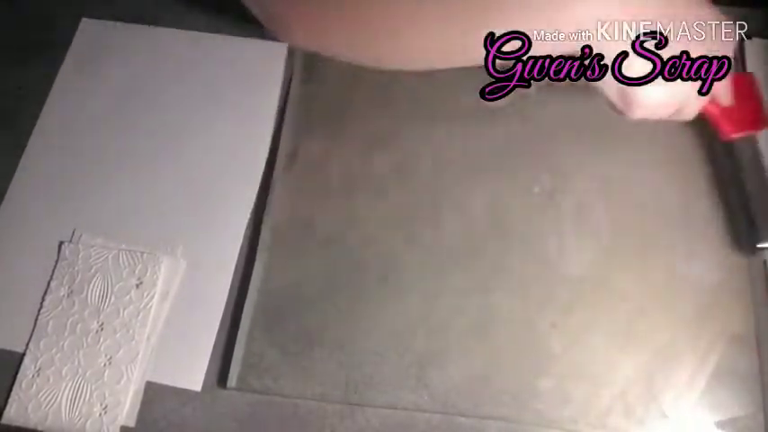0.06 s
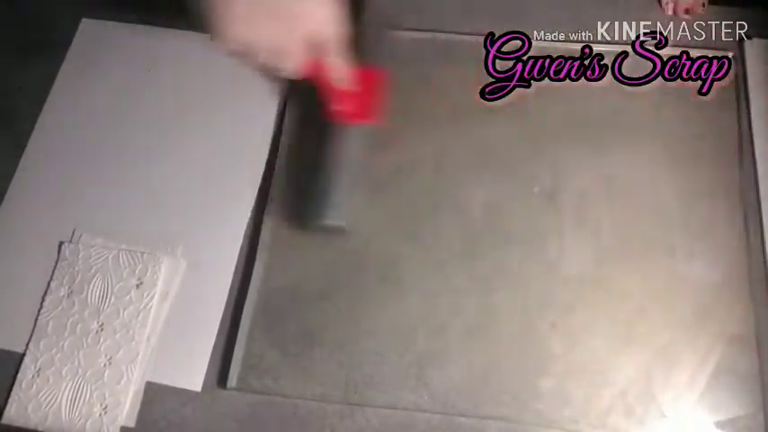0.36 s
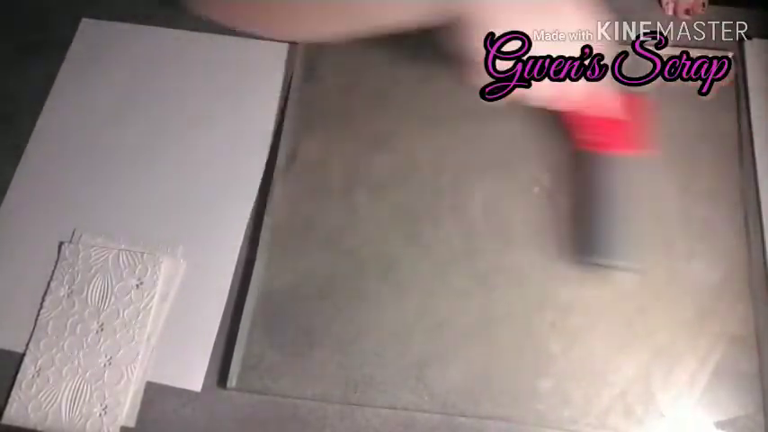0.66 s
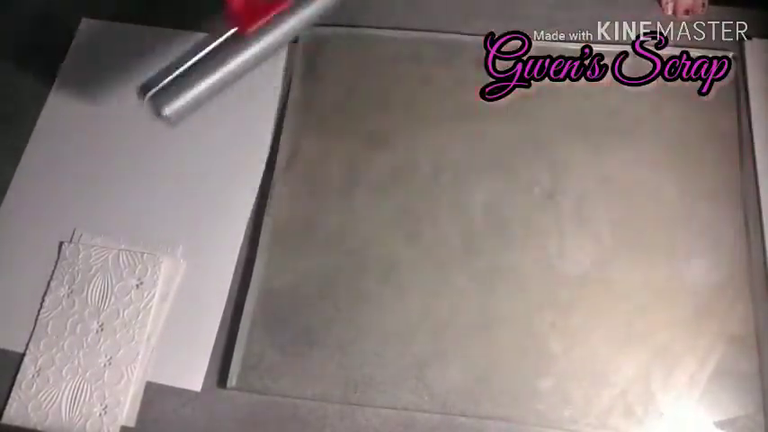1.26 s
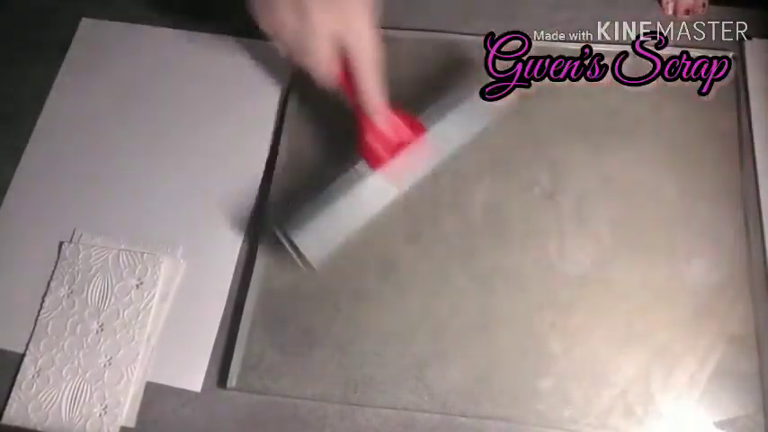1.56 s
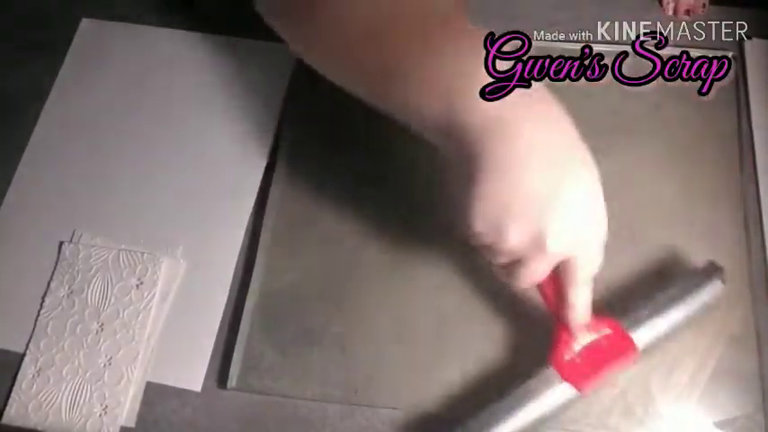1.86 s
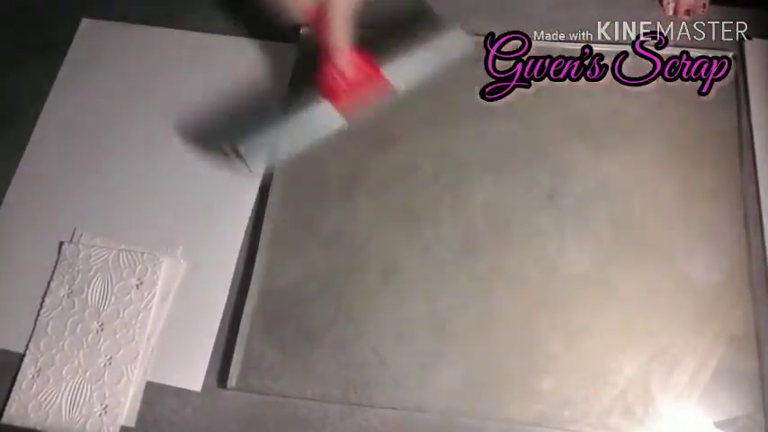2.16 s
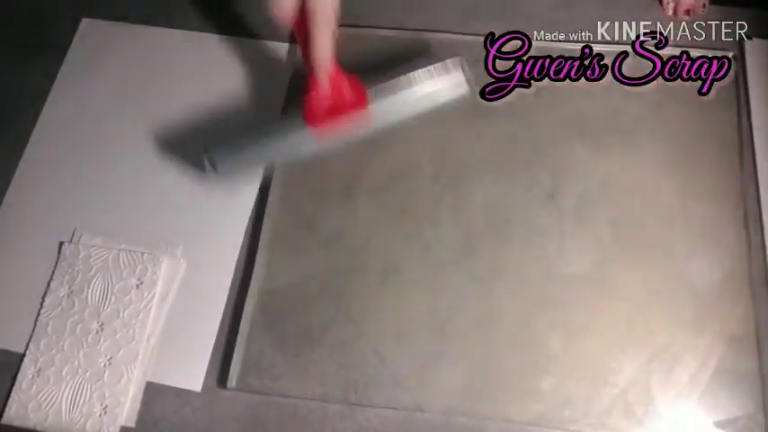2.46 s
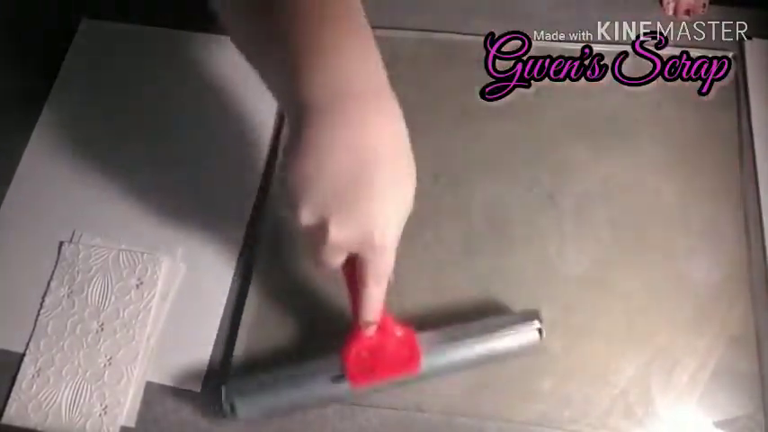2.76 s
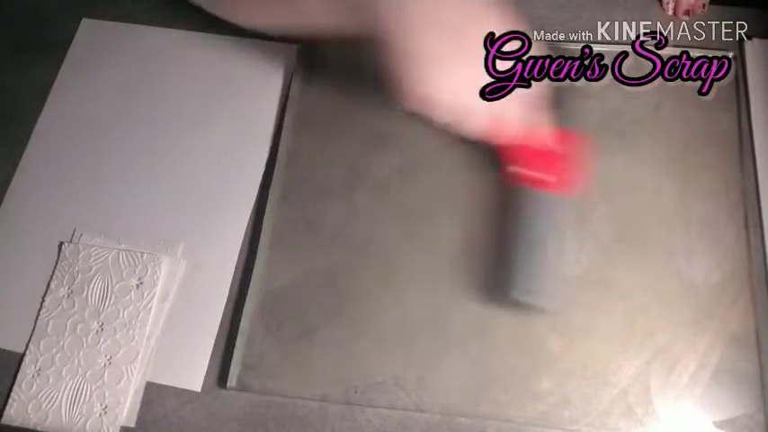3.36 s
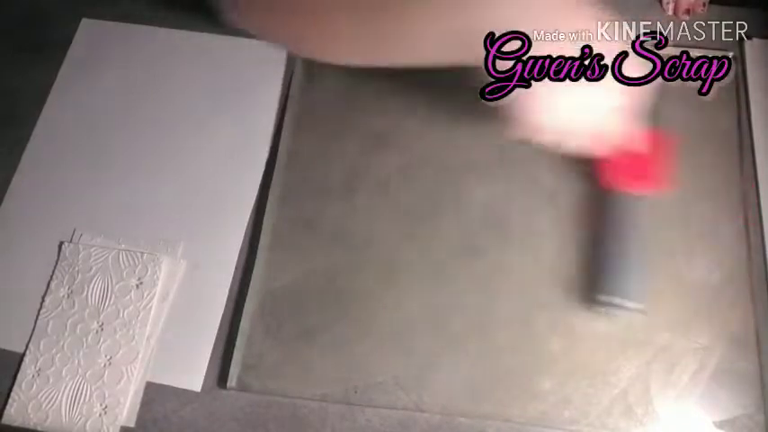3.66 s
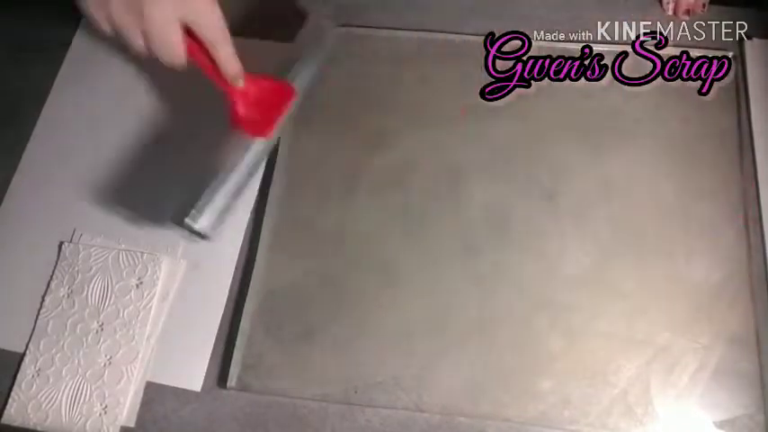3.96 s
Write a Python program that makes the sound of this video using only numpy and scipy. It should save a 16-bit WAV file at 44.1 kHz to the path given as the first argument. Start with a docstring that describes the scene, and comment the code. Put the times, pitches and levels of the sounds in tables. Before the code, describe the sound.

Close by in a small, quiet room, wet paint hisses and peels under a rubber hand roller in repeated strokes, each with a low table rumble. Twice the loose roller comes off the gel plate, spins with light clinks and is set down with a loud clack. The handle gives a few dull knocks between strokes. After more sticky rolling, it lifts and rattles again over faint room air and hum.

```python
"""A rubber roller runs to and fro through wet paint on a gel plate, over faint room air and hum.
From the first stroke the paint film peels off with a sticky hiss and the table rumbles beneath it.
Lifted at 1.1 s, the loose roller spins and clacks in its frame, then lands with a thump at 1.45 s.
It rolls on, lifts at 2.2 s and lands harder at 2.4 s. More strokes follow, with dull knocks of the
handle, until a last lift at 3.9 s sets it clacking again."""
import sys
import numpy as np
from scipy import signal
from scipy.fft import rfft, irfft
from scipy.io import wavfile

SR = 44100
rng = np.random.default_rng(int(sys.argv[2]) if len(sys.argv) > 2 else 0)


def transcribe(signal):
    """Save signal, clipped to [-1, 1], as a 16-bit WAV file at the path in sys.argv[1]."""
    frames = np.atleast_2d(signal).T
    limited = np.clip(frames, -1, 1)
    pcm = np.round(limited * 32767).astype(np.int16)
    wavfile.write(sys.argv[1], SR, pcm)


N = 185670
TIME, HZ = np.arange(N) / SR, np.fft.rfftfreq(N, 1 / SR)
AGE = TIME[:SR // 2]  # seconds since a blow
ROLLER_HZ, MEDIUM_BLOW_DB = 1938, -42

# pushes and pulls of the roller: fastest_s, speed_up_s, slow_down_s, hiss_db, weight_db, chafe_db
STROKES = [(-.1, .2, 0.18, -49, -47, -59), (0.299, 0.19, 0.15, -51, -48.5, -65.5),
           (.646, .143, 0.19, -49, -48.5, -66), (.982, 0.14, 0.37, -48.5, -45, -55.5),
           (1.702, 0.45, 0.24, -52.5, -61.5, -68.5), (2.046, .11, 0.53, -49, -54, -63.5),
           (2.649, .324, 0.11, -52, -62, -67.5), (2.911, 0.062, 0.2, -48, -52.5, -71),
           (3.388, 0.23, 0.21, -50, -51, -68.5), (3.819, 0.23, 0.21, -48.5, -49, -68)]
# the lifted roller spins freely: start_s, airborne_s, chafe_db
LIFTS = [(1.104, .347, -67), (2.192, .211, -65.5), (3.914, .35, -74)]
# the loose roller strikes its frame: start_s, crack_db, frame_db, roller_db, handle_db
CLACKS = [(1.092, -37, -63, -29.5, -41.5), (1.126, -44, -74, -66, -54), (1.2657, -56, -61, -44.5, -56.5),
          (1.354, -40.5, -44, -38, -45.5), (1.3635, -35.5, -32, -30, -52), (1.369, -43, -53, -43, -56),
          (1.397, -49, -58, -42, -65), (1.468, -52, -46, -44, -59), (2.183, -49, -56, -48, -43.5),
          (2.376, -52, -46, -52, -42.5), (2.387, -60, -37.5, -49, -56), (3.896, -52.5, -62, -46, -50.5),
          (4.025, -45, -46.5, -44.5, -45.5), (4.142, -58, -66, -53, -55.5),
          (4.1475, -53.5, -54.5, -42, -52.5), (4.178, -36, -33.5, -35.5, -46)]
# the roller is set down hard: start_s, crack_db, frame_db, thump_db
LANDINGS = [(1.4521, -23, -21.5, -28.5), (2.403, -19, -18.5, -24)]
# likeness of the sound at the two microphone ports: frequency_hz, correlation
COHERENCE = [(60, .993), (130, .96), (290, .8), (640, .46), (1400, -.1), (3100, 0), (15000, 0)]
# level difference between the ports: frequency_hz, left_minus_right_db
BALANCE = [(60, 0), (140, -3), (250, -1), (400, -5), (700, -4), (1200, 4), (2380, -1.5), (4400, 1.4),
           (8100, -0.9), (15000, 2)]


def amp(db):
    """Amplitude ratio of a level in decibels."""
    return 10 ** (np.asarray(db) / 20)


def unit_rms(x):
    """Normalisation to unit mean power."""
    return x / np.sqrt(np.mean(x ** 2) + 1e-20)


def curve_at(points, hz):
    """Interpolation on a logarithmic frequency axis."""
    frequencies, values = np.transpose(points)
    return np.interp(np.log(hz + 1), np.log(frequencies + 1), values)


def add(mix, start_s, sound):
    """Superposition of a sound on the mix."""
    part = mix[:, round(start_s * SR):][:, :sound.shape[-1]]
    part += sound[..., :part.shape[1]]


def onset(rise_s):
    """Exponential approach from 0 to 1."""
    return 1 - np.exp(-AGE / rise_s)


def wobble(rate_hz):
    """Random modulation: low-passed noise of unit power."""
    return unit_rms(irfft(rfft(rng.standard_normal(N)) / (1 + (HZ / rate_hz) ** 4), N))


def at_ports(pair, gain):
    """Partial coherence: two independent signals are filtered and made alike in the bass."""
    left, other = rfft(pair)
    coherence = np.clip(curve_at(COHERENCE, HZ), -1, 1)
    right = coherence * left + np.sqrt(1 - coherence ** 2) * other
    balance = amp(np.outer([.5, -.5], curve_at(BALANCE, HZ)))
    return unit_rms(irfft(np.array([left, right]) * gain * balance, N))


def noise(gain):
    """Spectrally shaped Gaussian noise of unit power."""
    return at_ports(rng.standard_normal((2, N)), gain)


def snaps(per_s, spread_db):
    """Shot noise: impulses at random moments, a few much larger than the rest."""
    size = amp(spread_db * np.minimum(rng.exponential(1, (2, N)), 4)) * rng.choice([-1, 1], (2, N))
    return size * (rng.random((2, N)) < per_s / SR)


def resonance(hz, width_hz):
    """Frequency response of a damped resonator."""
    return 1 / (1 + 2j * (HZ - hz) / width_hz)


def mode(hz, db, t60_s, sharp_hz=0, settle_s=0.016):
    """Damped free vibration; the lower the coherence, the more the ports differ in phase."""
    cycles = hz * AGE + sharp_hz * settle_s * onset(settle_s)
    phase_gap = np.arccos(np.clip(curve_at(COHERENCE, hz), -1, 1)) * rng.choice([-1, 1])
    side = np.array([[.5], [-.5]])
    envelope = amp(db + side * curve_at(BALANCE, hz) - 60 * AGE / t60_s)
    return envelope * np.sin(2 * np.pi * cycles + side * phase_gap)


def rolling_level(levels_db, exponent, release_db_per_s=301):
    """Power law: amplitude follows each stroke's bell of speed and dies away in a lift. Returns dB."""
    power, contact = np.zeros(N), np.ones(N)
    for (fastest_s, up_s, down_s, *_), db in zip(STROKES, levels_db):
        speed = 10 ** -((TIME - fastest_s) / np.where(TIME < fastest_s, up_s, down_s)) ** 2
        power += (amp(db) * speed ** exponent) ** 2
    for start_s, airborne_s, _ in LIFTS:
        airborne = (TIME > start_s) & (TIME < start_s + airborne_s)
        contact *= amp(-release_db_per_s * (TIME - start_s) * airborne)
    return 10 * np.log10(power * contact ** 2 + 1e-10)


def background(air_db=-65.5, waver_db=5.0):
    """Noise floor: room air, and an appliance's hum wavering in amplitude and phase."""
    # spectrum of the air: frequency_hz, relative_db
    air = [(15, -43), (25, -27), (77, -1), (167, 1), (450, -9.5), (621, -19), (769, -21), (1310, -27.5),
           (2020, -32.5), (2180, -21), (2630, -27), (3630, -23.5), (5570, -22.5), (8100, -25), (15000, -30)]
    # tones of the appliance: pitch_hz, level_db
    tones = [(122, -70.5), (285, -81.5)]
    hum = np.zeros(N)
    for hz, db in tones:
        envelope = np.sqrt(2) * amp(db + waver_db * wobble(rate_hz=8.5))
        hum += envelope * np.sin(2 * np.pi * hz * TIME + .5 * wobble(rate_hz=5.1))
    return amp(air_db) * noise(amp(curve_at(air, HZ))) + hum


def room(sound, gap_s=.006):
    """Reverberation: a small furnished room returns a diffuse tail whose treble dies first."""
    # reverberation time: frequency_hz, t60_s
    decay = [(100, 0.36), (1000, 0.18), (4000, 0.12), (12000, 0.1)]
    reflections = noise(1)[:, :len(AGE)] * (AGE > gap_s)
    hz, age, spectra = signal.stft(reflections, SR, nperseg=256)
    tail = signal.istft(spectra * amp(-60 * age / curve_at(decay, hz)[:, None]), SR, nperseg=256)[1]
    return signal.fftconvolve(sound, tail / np.linalg.norm(tail[0]), axes=1)[:, :N]


def axle(chafe_db, drag_db, high_hz=4745, coast_db_per_s=40):
    """Stick-slip friction: the axle excites two roller modes, under load and while spinning down."""
    slips, spin = snaps(per_s=1500, spread_db=3.5), np.zeros(N)
    for start_s, airborne_s, db in LIFTS:
        airborne = (TIME > start_s) & (TIME < start_s + airborne_s)
        spin += amp(db - coast_db_per_s * abs(TIME - start_s)) * airborne
    low = at_ports(slips, resonance(ROLLER_HZ, width_hz=74) * resonance(2700, width_hz=1900))
    high = at_ports(slips, resonance(high_hz, width_hz=140) ** 2)
    return (amp(chafe_db) + spin) * low + (amp(drag_db - 11) + amp(-2) * spin) * high


def rumble(press_db, drag_db):
    """Forced vibration: the uneven roller shakes the table; drag on the gel hums in the hollow handle."""
    # spectrum of the shaken table: frequency_hz, relative_db
    shaking = [(25, -38), (42, -1), (65, 10.5), (90, 3), (115, -3), (160, -11), (215, -14), (350, -24.5),
               (480, -17), (680, -60.5), (900, -51), (1500, -44)]
    handle_hum = noise(resonance(485, width_hz=130) ** 2
                       + amp(4) * resonance(270, width_hz=73) ** 2
                       + amp(-7) * resonance(876, width_hz=250) ** 2)
    return amp(press_db) * noise(amp(curve_at(shaking, HZ))) + amp(drag_db - 14.5) * handle_hum


def handle_knocks(knock_low_hz=107, thud_low_hz=470, thud_high_hz=1050, puff_t60_s=.045):
    """Heavy damping: held in the hand, the struck handle gives only a puff and a brief hollow note."""
    # knocks of the handle alone as a stroke turns or ends: start_s, level_db, cutoff_hz
    knocks = [(1.845, -39.5, 3700), (1.882, -42, 860), (2.768, -70, 2540), (3.913, -48, 1500)]
    # spectrum of the puff: frequency_hz, relative_db
    puff_spectrum = [(80, -24), (200, -19.5), (450, -7), (900, -6.5), (1400, -1), (2000, 11.5), (8000, 20)]
    # modes of the hollow plastic handle: pitch_hz, relative_db, t60_s
    handle_modes = [(248, 6, 0.026), (409, 1, 0.038), (550, 2, 0.026), (887, 2, 0.046), (1640, 7, .03)]
    out, puff_noise = np.zeros((2, N)), noise(amp(curve_at(puff_spectrum, HZ)))
    blows = [(start_s, db, knock_low_hz, high_hz) for start_s, db, high_hz in knocks]
    blows += [(start_s, db, thud_low_hz, thud_high_hz) for start_s, *_, db in CLACKS]
    for start_s, db, low_hz, high_hz in blows:
        band = signal.butter(4, [low_hz, high_hz], "bandpass", fs=SR, output="sos")
        burst = np.roll(puff_noise, rng.integers(N), 1)[:, :len(AGE)]
        puff = unit_rms(signal.sosfilt(band, burst)) * amp(-4 - 60 * AGE / puff_t60_s)
        hollow = sum(mode(hz, mode_db, t60_s) / np.sqrt(1 + (hz / high_hz) ** 6 + (low_hz / hz) ** 6)
                     for hz, mode_db, t60_s in handle_modes)
        add(out, start_s, amp(db) * (puff + amp(-3) * hollow) * onset(rise_s=.0007))
    return out


def table_thumps(delay_s=0.00236):
    """Cushioned impact: the soft plate passes each landing on to the table's low modes."""
    # modes of the table: pitch_hz, relative_db, t60_s
    table_modes = [(50, -7, 0.13), (67.4, -4, 0.097), (91.6, 8.5, 0.035), (130, -28, 0.12),
                   (189, -3.5, 0.086), (232.6, -15.5, 0.16), (393, -7, 0.027), (449.5, -8, 0.064)]
    out = np.zeros((2, N))
    for start_s, *_, thump_db in LANDINGS:
        boom = -sum(mode(*row) for row in table_modes)
        add(out, start_s + delay_s, amp(thump_db) * boom * onset(rise_s=0.0037))
    return out


def roller_clinks(twin_hz=2020, t60_s=.135, medium_sharp_hz=100, max_sharp_hz=160, halving_db=5):
    """Beating: two close modes sink to their free pitch as the roller comes off the axle's stop."""
    out = np.zeros((2, N))
    for start_s, _, _, db, _ in CLACKS:
        # a harder blow starts less sharp
        sharp_hz = min(medium_sharp_hz / 2 ** ((db - MEDIUM_BLOW_DB) / halving_db), max_sharp_hz)
        pair = mode(ROLLER_HZ, db, t60_s, sharp_hz) + mode(twin_hz, db - 11, t60_s, sharp_hz)
        add(out, start_s, pair * onset(rise_s=0.001))
    chatter_db = .6 * wobble(rate_hz=240)
    return out * amp(chatter_db)


def frame_clacks(crack_t60_s=0.04, scatter_t60_s=0.072, medium_ring_share=0.52, halving_db=17.5):
    """Impact excitation: each blow gives a crack, its scatter off the table and a ring of the frame."""
    # spectrum of the crack: frequency_hz, relative_db
    crack_spectrum = [(200, -37), (370, -23.5), (500, 6), (680, -15), (950, -1), (1450, -4.5), (2400, 3),
                      (2950, 3), (3450, -6), (4200, -6), (4750, 4), (5500, -10), (6600, -14.5),
                      (7600, -10.5), (9000, -18.5), (15000, -27.5)]
    # modes of the frame: pitch_hz, relative_db, longest_t60_s
    frame_modes = [(1925, -3, .13), (2070, -7, .13), (2175, -7, .12), (2345, -5, .13), (2510, -11, .09),
                   (2635, -9, .08), (3130, -9, .08), (3490, -6, .09), (3690, -15, .08), (4130, -19, .09),
                   (4470, -18, .08), (4720, -3, .11), (4790, -6, .08), (5900, -26, .07), (7400, -26, .08),
                   (7830, -27, .08)]
    rings, crack_power = np.zeros((2, N)), np.zeros((1, N))
    crack_noise = noise(amp(curve_at(crack_spectrum, HZ)))
    rise = onset(rise_s=0.0006)
    envelope = rise * (amp(-60 * AGE / crack_t60_s) + amp(-19 - 60 * AGE / scatter_t60_s))
    for start_s, crack_db, frame_db, *_ in CLACKS + LANDINGS:
        add(crack_power, start_s, (amp(crack_db) * envelope) ** 2)
        # a harder blow rings brighter, and shorter because it presses the roller home
        force_db = frame_db - MEDIUM_BLOW_DB
        tilt_db_per_octave = 0.37 * force_db
        ring_share = min(medium_ring_share / 2 ** (force_db / halving_db), 1)
        for hz, db, t60_s in frame_modes:
            ring = mode(hz, frame_db + db + tilt_db_per_octave * np.log2(hz / 2000), t60_s * ring_share)
            polarity = rng.choice([-1, 1])  # depends on where the frame is hit
            add(rings, start_s, polarity * rise * ring)
    return rings + crack_noise * np.sqrt(crack_power)


def paint_hiss(peel_db, flutter_db=1.05, dull_hz=5000):
    """Film splitting: paint threads snap behind the roller as shot noise, duller when it rolls slowly."""
    # spectrum of the peeling film: frequency_hz, relative_db
    film = [(500, -19), (900, -20.5), (1300, -20.5), (1650, -11), (2100, -11), (2700, -9), (3700, -10),
            (4700, -5.5), (5500, -7), (6500, -6.5), (7300, -1.5), (8300, -6.5), (12000, -8), (15400, -7.5)]
    threads = snaps(per_s=14000, spread_db=2.0) * amp(flutter_db * wobble(rate_hz=110))
    hiss = at_ports(threads, amp(curve_at(film, HZ)))
    dull_hiss = signal.sosfilt(signal.butter(1, dull_hz, fs=SR, output="sos"), hiss)
    dulling = amp(0.065 * (np.max(peel_db) - peel_db)) - 1
    return amp(peel_db) * (hiss + dulling * dull_hiss)


def scene(weight_share=0.38):
    """Superposition of the rolling sounds, the blows with their reverberation, and the background."""
    *_, stroke_hiss_db, stroke_weight_db, stroke_chafe_db = np.transpose(STROKES)
    peel_db = rolling_level(stroke_hiss_db, exponent=1)
    press_db = rolling_level(stroke_weight_db, exponent=1.64)
    chafe_db = rolling_level(stroke_chafe_db, exponent=1.35)
    drag_db = weight_share * press_db + (1 - weight_share) * peel_db  # from both weight and paint
    blows = frame_clacks() + roller_clinks() + table_thumps() + handle_knocks()
    rolling = paint_hiss(peel_db) + rumble(press_db, drag_db) + axle(chafe_db, drag_db)
    return rolling + blows + amp(-12.5) * room(blows) + background()


def record(dry):
    """Band limiting: the microphone passes 42 Hz to 15.6 kHz."""
    bass_cut = signal.butter(6, 42, "highpass", fs=SR, output="sos")
    treble_cut = signal.firwin(511, 15600, window=("kaiser", 9), fs=SR)
    return signal.oaconvolve(signal.sosfilt(bass_cut, dry), treble_cut[None], "same")


dry = scene()
out = record(dry)
transcribe(out)
```